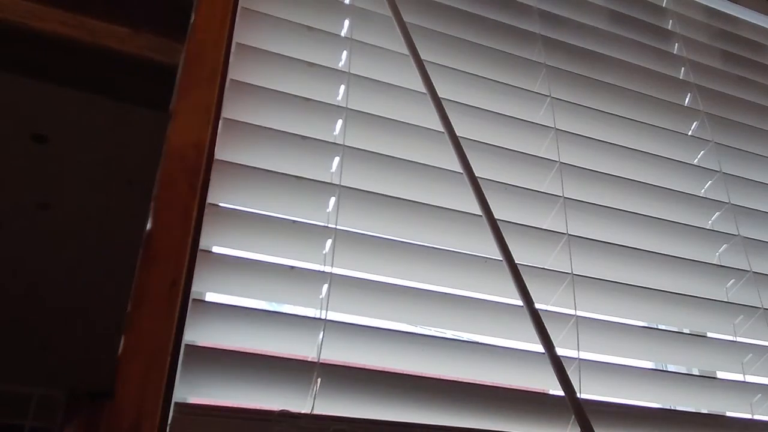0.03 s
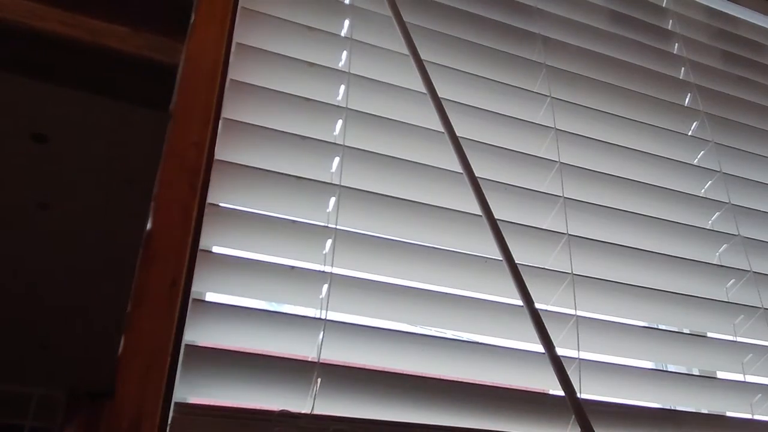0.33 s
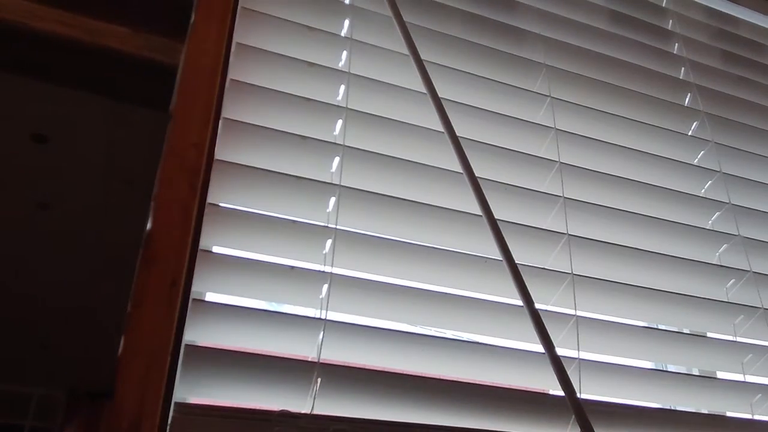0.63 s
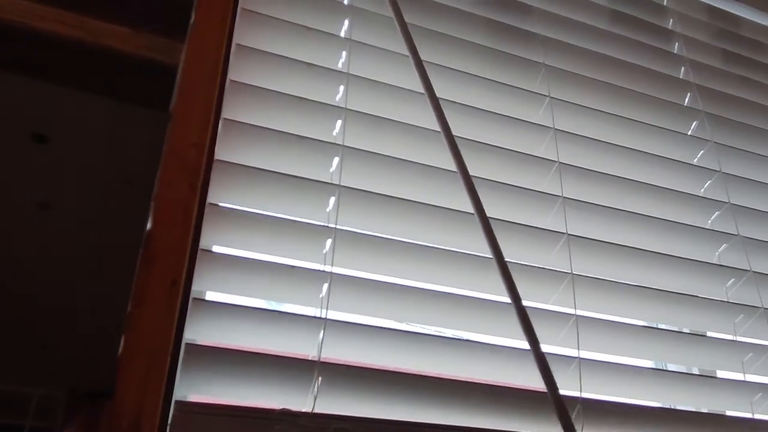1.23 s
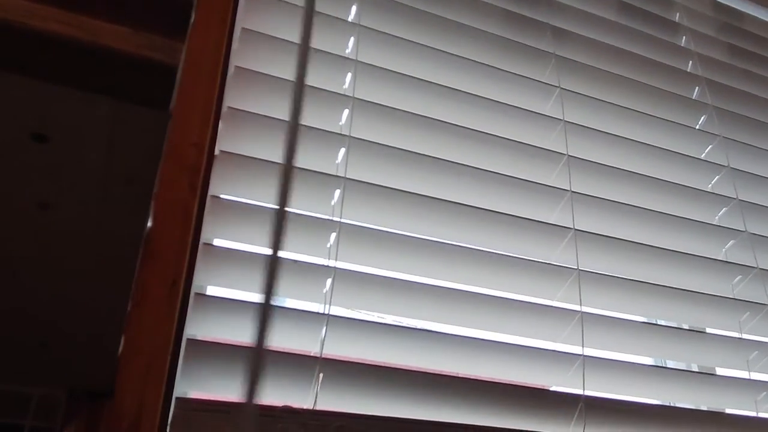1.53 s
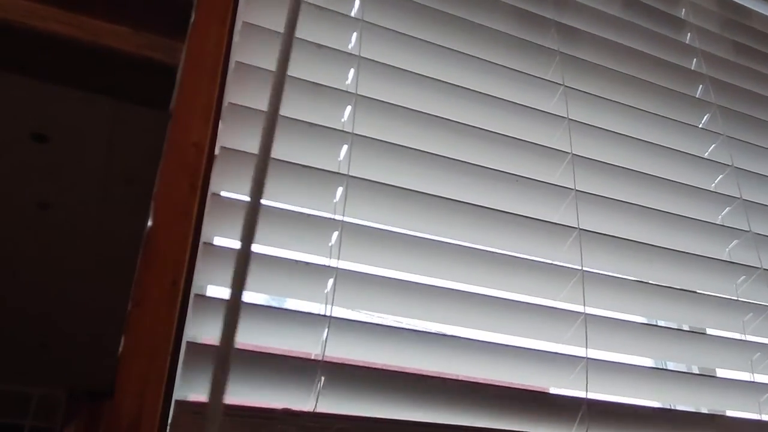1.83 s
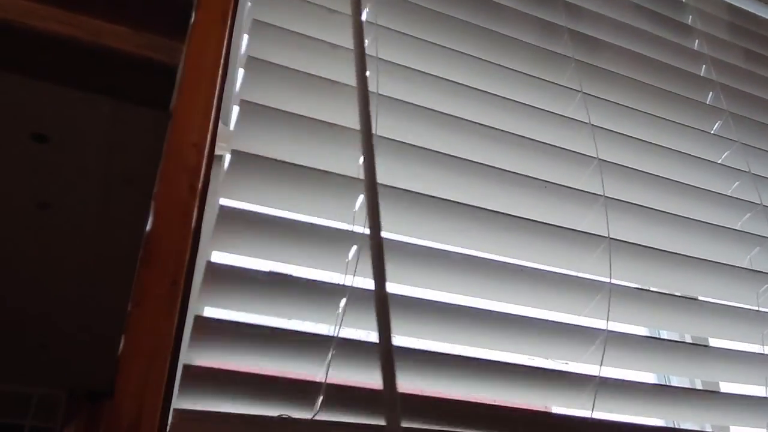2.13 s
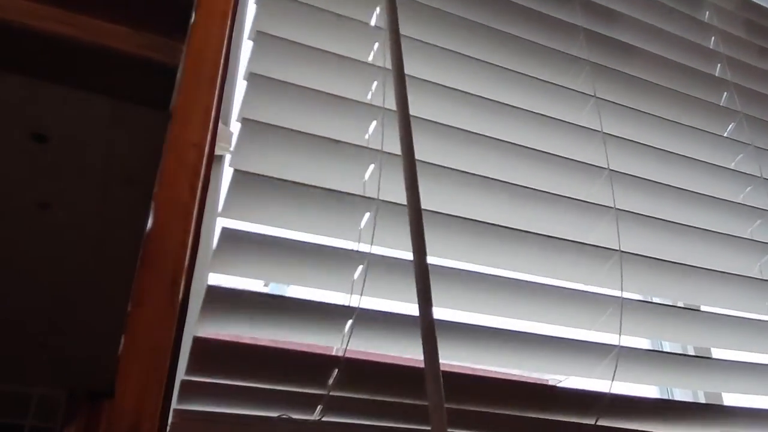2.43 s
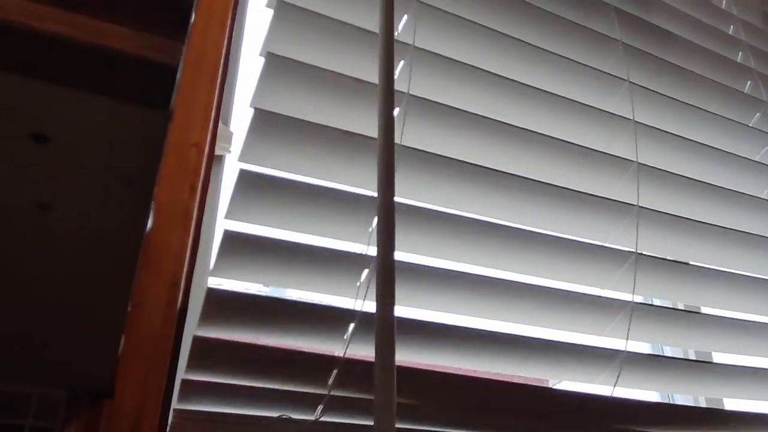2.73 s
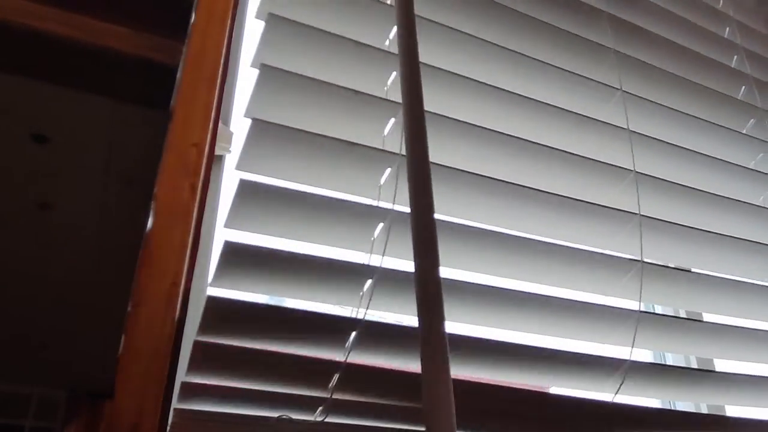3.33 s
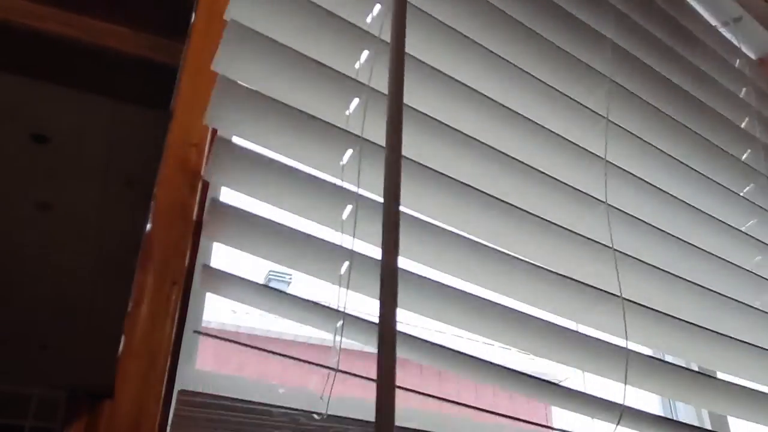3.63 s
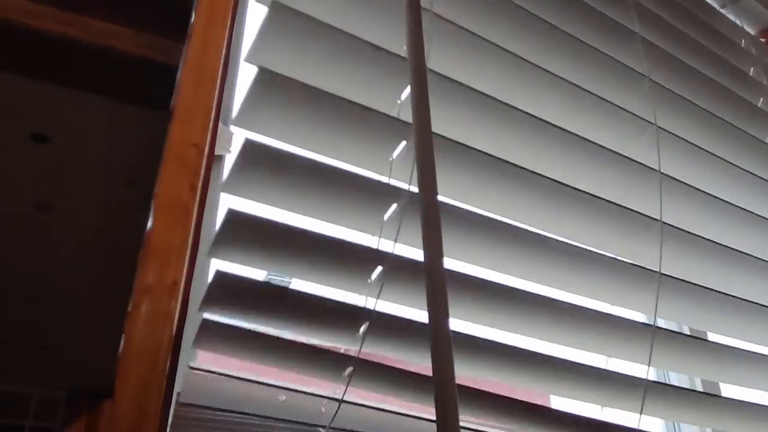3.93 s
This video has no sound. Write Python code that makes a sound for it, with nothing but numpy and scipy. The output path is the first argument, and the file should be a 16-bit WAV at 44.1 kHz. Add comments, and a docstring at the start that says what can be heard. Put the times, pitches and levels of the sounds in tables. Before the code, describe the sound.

Window blind slats rustle faintly, then tap, clack and scrape as they are handled. They rattle louder and slam shut, the bottom rail bumping the frame, heard up close in a small, quiet room.

```python
"""Window blinds tilted shut

Close up in a small quiet room, the tilt gear knocks and the wand taps lightly against the slats.
Pushed about, the slats rub, scrape with a brief pitch and clack together, which sets the hanging blind
ringing. They slam shut with a hard plastic snap, and the bottom rail shudders on the frame."""
import sys
import numpy as np
from scipy import signal
from scipy.fft import rfft, irfft
from scipy.io import wavfile
from scipy.ndimage import uniform_filter1d

SR = 44100
rng = np.random.default_rng(int(sys.argv[2]) if len(sys.argv) > 2 else 0)


def digitize_waveform(pressure):
    """Quantize a signal to 16-bit integers and store it at the path in sys.argv[1].

    Rows of a 2-D input are taken as channels; values are limited to [-1, 1].
    """
    field = np.atleast_2d(pressure).T
    bounded = np.clip(field, -1, 1)
    quanta = np.round(bounded * 32767).astype(np.int16)
    wavfile.write(sys.argv[1], SR, quanta)


N = 176400
HZ = np.fft.rfftfreq(N, 1 / SR)


def amp(db):
    """Decibels to gain."""
    return 10 ** (np.asarray(db) / 20)


def unit_rms(x):
    """Scales to rms 1."""
    return x / np.sqrt(np.mean(x ** 2) + 1e-20)


def curve(points, hz):
    """Reads breakpoints on a log-frequency axis."""
    f, value = np.transpose(points)
    return np.interp(np.log(hz + 1), np.log(f + 1), value)


def add(mix, s, sound):
    """Mixes a stereo sound in at s seconds."""
    part = mix[:, max(round(s * SR), 0):][:, :sound.shape[1]]
    part += sound[:, :part.shape[1]]


def panned(pan_db):
    """Stereo gains, with left pan_db above right."""
    return amp(np.array([[pan_db], [-pan_db]]) / 2)


def room_tone():
    """A faint, steady bed of low noise."""
    # room tone spectrum: (frequency [Hz], level [dB])
    spectrum = [(25, -11.5), (100, -4), (140, -12.5), (240, -2.5), (450, -14), (1200, -19), (4000, -28.5),
                (12000, -32), (13200, -52.5)]
    noise = rfft(rng.standard_normal((2, N)))
    return amp(-69.5) * unit_rms(irfft(noise * amp(curve(spectrum, HZ)), N))


def room_reverb(send):
    """The small room's tail: each band dies at its own speed."""
    # room decay: (frequency [Hz], t60 [s])
    decay = [(100, 0.18), (400, 0.34), (1000, 0.52), (2800, 0.39), (7000, 0.3), (14000, 0.28)]
    hz, t, noise = signal.stft(rng.standard_normal((2, SR)), SR, nperseg=256)
    tail = signal.istft(noise * amp(-60 * t / curve(decay, hz)[:, None]), SR, nperseg=256)[1]
    tail *= np.minimum(np.arange(tail.shape[1]) / SR / .0041, 1)  # fade-in
    return signal.fftconvolve(send, tail / np.linalg.norm(tail[0]), axes=1)[:, :N]


def ringing(modes):
    """Dying modes, slightly out of phase across the stereo pair; low ones lead on the right."""
    t = np.arange(SR * 3 // 4) / SR
    lead_turns, out = np.array([[0], [.25]]), np.zeros((2, len(t)))
    for hz, db, t60 in modes:
        turns = hz * t + lead_turns * (hz < 450) + .2 * rng.random((2, 1))
        out += amp(db - 60 * t / t60) * np.sin(2 * np.pi * turns)
    return out


def blind_resonance(slats):
    """The whole hanging blind rings on, driven by its slats."""
    # modes of the blind: (frequency [Hz], level [dB], t60 [s])
    modes = [(182, -13, 0.44), (275, -16, 0.6), (307.2, -9.5, 1), (566, -14.5, 0.34), (688, -11, 0.4),
             (825.4, -6, 0.47), (966.6, -5, 0.44), (1088, -8, 0.39), (1370, -20.5, .35)]
    ring = ringing(modes)
    return amp(-18.5) * signal.fftconvolve(slats[:1], ring / np.linalg.norm(ring[0]), axes=1)[:, :N]


def knocks(hits, modes, attack_s):
    """Blows on one part of the blind, smeared by the room's first quick echoes."""
    out, t = np.zeros((2, N)), np.arange(SR // 10) / SR
    for s, db in hits:
        ring = ringing(modes)
        ring *= np.sin(np.pi / 2 * np.minimum(np.arange(ring.shape[1]) / SR / attack_s, 1)) ** 2
        echoes = rng.standard_normal((2, len(t))) * np.exp(-t / .019)
        paths = (t == 0) + amp(-1) * echoes / np.linalg.norm(echoes[0])
        add(out, s, signal.fftconvolve(ring, paths, axes=1) * amp(db))
    return out


def gear_knocks():
    """The tilt gear knocks softly as it turns."""
    # knocks: (time [s], level [dB])
    hits = [(.088, -58), (.263, -49), (.507, -52), (.627, -60), (1.27, -36)]
    # gear modes: (frequency [Hz], level [dB], t60 [s])
    modes = [(495, -2, .08), (570, 0, .06), (720, -10, .04)]
    return knocks(hits, modes, attack_s=.007)


def wand_taps():
    """The wand swings into the slats with light, short taps."""
    # taps: (time [s], level [dB])
    hits = [(1.377, -20), (1.448, -47.5), (1.556, -26.5)]
    # wand modes: (frequency [Hz], level [dB], t60 [s])
    modes = [(970, -6, .04), (1012, -25, .4), (1080, 0, .04), (1389, -12, .035), (1600, -14, .02),
             (2100, -15, .025)]
    return knocks(hits, modes, attack_s=.004)


def rail_bumps():
    """The bottom rail bumps the frame with low thuds, ending in a shudder."""
    # bumps: (time [s], level [dB])
    hits = [(1.208, -36), (3.675, -28), (3.9, -17), (3.926, -18), (3.95, -20), (3.974, -23)]
    # rail modes: (frequency [Hz], level [dB], t60 [s])
    modes = [(205, 0, .2), (255, -6, .16), (310, -5, .16)]
    return knocks(hits, modes, attack_s=.009)


def shut_snap():
    """A hard, bright snap as the slats slam shut."""
    # impacts: (time [s], level [dB])
    hits = [(3.6745, -13), (3.679, -11.5)]
    # plastic modes: (frequency [Hz], level [dB], t60 [s])
    modes = [(4140, 2, 0.016), (4505, 3.5, 0.012), (5120, 1.5, 0.011)]
    return knocks(hits, modes, attack_s=.001)


def contacts(grain_db):
    """Dense tiny contacts of uneven size, in four stereo bands of rms 1: bass, body, ring and tick."""
    # the slats' tone as heard through the microphone, whose notch, peaks and roll-off shape
    # the top treble: (frequency [Hz], level [dB])
    miked_tone = [(30, -48), (100, -24.5), (135, -25), (185, -0.5), (260, -9.5), (410, -9), (560, 0),
                  (690, -3), (800, 3.5), (1100, 6.5), (1400, 5.5), (1950, 1), (2500, -3.5), (3150, -7.5),
                  (3900, -5.5), (4900, -11), (5800, -12.5), (7000, -9.5), (8200, -8), (8900, -18),
                  (9500, -28), (10500, -19), (11800, -11), (12400, -20.5), (13200, -30), (15500, -35)]
    shared_power, crossovers_hz = .032, (600, 2500, 6500)
    grit = rng.standard_normal((3, N))  # left, right, shared
    grit *= amp(grain_db * np.repeat(rng.standard_normal(N // 16 + 1), 16)[:N])
    stereo = np.sqrt(1 - shared_power) * grit[:2] + np.sqrt(shared_power) * grit[2]
    spectrum = rfft(stereo) * amp(curve(miked_tone, HZ))
    lowpasses = [0 * HZ] + [1 / (1 + (HZ / f) ** 8) for f in crossovers_hz] + [1 + 0 * HZ]
    return np.array([unit_rms(irfft(spectrum * band, N)) for band in np.diff(lowpasses, axis=0)])


def one_slat(bands, s, size):
    """The contacts from time s on, through one slat's own irregular comb of modes."""
    depth_db, spacing_hz = 3.3, 130
    part = bands[:, :, round(s * SR):][:, :, :size]
    hz = np.fft.rfftfreq(part.shape[2], 1 / SR)
    grid = np.arange(0, SR / 2, spacing_hz)
    comb = unit_rms(amp(depth_db * np.interp(hz, grid, rng.standard_normal(len(grid)))))
    return irfft(rfft(part) * comb, part.shape[2])


def slat_rubs():
    """Slats slide on each other and on their cords, catching unevenly."""
    # strokes: (start [s], length [s], bass [dB], body [dB], ring [dB], tick [dB], swell [dB])
    strokes = [(0.024, 0.29, -72.5, -76.5, -77.5, -74.5, -5), (0.433, 0.12, -92, -83, -78.5, -77, -15),
               (0.495, 0.082, -76, -82, -72, -65.5, -9.5), (0.571, 0.12, -81, -102, -79, -80.5, 11),
               (0.708, 0.061, -72, -66.5, -72, -73, 2.5), (0.769, 0.12, -82, -70.5, -78, -82, 5),
               (0.846, 0.025, -90, -71, -99, -66.5, -2), (1.199, 0.016, -58.5, -51.5, -77, -80, 7),
               (1.304, 0.087, -54, -50.5, -62, -69, 7.5), (1.527, 0.044, -70.5, -60, -68.5, -74.5, 13),
               (1.748, 0.022, -64, -47, -60, -63, 31), (2.02, 0.19, -72, -65, -76, -64, -7),
               (2.396, 0.11, -66.5, -58, -67, -76, 16), (2.743, 0.031, -67, -56, -65.5, -73, 5.5),
               (3.285, 0.13, -64, -53.5, -70, -69.5, 11.5), (3.381, 0.12, -58, -43, -55.5, -67, 22),
               (3.483, 0.16, -46, -43, -45.5, -42, 10), (3.64, 0.1055, -26, -35.5, -42, -47.5, 7.5),
               (3.75, 0.12, -33, -34, -39, -49, -8.5), (3.869, 0.14, -49.5, -38.5, -52.5, -54.5, -6.5)]
    flutter_db, flutter_s, fade_s = 1.5, .01, .012
    bands, out = contacts(grain_db=3.5), np.zeros((2, N))
    bands *= amp(flutter_db * unit_rms(uniform_filter1d(rng.standard_normal(N), int(flutter_s * SR))))
    for s, length, *levels, swell_db in strokes:
        rub = np.tensordot(amp(levels), one_slat(bands, s, round((length + fade_s) * SR)), 1)
        t = np.arange(rub.shape[1]) / SR
        fades = np.clip(np.minimum(t, length + fade_s - t) / fade_s, 0, 1)
        swell = amp(swell_db * (np.minimum(t / length, 1) - .5))
        add(out, s, rub * fades * swell)
    return out * panned(-2)


def slat_scrapes():
    """A slat's edge drags over the next: friction feeds resonances that sag as the contact slides."""
    # drags: (start [s], length [s], level [dB], pitch [Hz])
    drags = [(2.423, 0.056, -51.5, 1390), (2.476, 0.029, -40, 1370), (2.925, 0.033, -55, 1150),
             (2.988, 0.081, -56, 1407), (3.463, .035, -34, 1399)]
    # edge resonances: (ratio to the pitch, width [Hz], level [dB])
    resonances = [(.83, 69, -7.5), (1, 80, -1.5), (1.252, 500, -3), (1.52, 120, -14.5), (1.692, 89, -3.5)]
    sag, out = .036, np.zeros((2, N))
    for s, length, db, hz in drags:
        progress = np.linspace(0, 1, round(length * SR))
        turns = np.cumsum(hz * (1 - sag * (progress - .5))) / SR
        scrape = np.zeros((2, len(turns)))
        for ratio, width, mode_db in resonances:
            friction = rng.standard_normal((2, N // 10)) + 1j * rng.standard_normal((2, N // 10))
            lowpass = signal.butter(2, width / 2, fs=SR, output="sos")
            wobble = signal.sosfilt(lowpass, friction)[:, -len(turns):]
            scrape += amp(mode_db) * unit_rms((wobble * np.exp(2j * np.pi * ratio * turns)).real)
        pressure = np.interp(progress, [0, .6, 1], [0, 1, 0]) ** .5
        add(out, s, amp(db) * unit_rms(scrape) * pressure)
    return out


def slat_clacks():
    """One slat strikes the next: a flurry of contacts lasting milliseconds, and the slat's short note."""
    # clacks, with the four bands relative to the level: (time [s], level [dB], bass [dB], body [dB],
    # ring [dB], tick [dB], left over right [dB], slat pitch [Hz], decay [s])
    hits = [(1.769, 0.5, -38.5, -23, -24.5, -20.5, 0.5, 940, 0.0058),
            (1.792, 0.5, -37, -18, -21, -17.5, -0.5, 717, 0.01),
            (1.959, -38.5, -6.5, 5.5, -3.5, -11, -4.5, 850, 0.0089),
            (1.992, -30.5, -25.5, -2, -12.5, -15, 1.5, 1116, 0.0054),
            (2.036, -24.5, -5, -4.5, -10.5, -21, -1.5, 940, 0.013),
            (2.06, -32.5, -33, -8, -7, -6.5, -5, 1017, 0.0022),
            (2.092, -33, -47, -10, -28, -17, -6, 698, 0.0028),
            (2.349, -45.5, -23.5, -7.5, -15, -12.5, -4, 1587, 0.017),
            (2.769, -35, -14, -7.5, 2, -2.5, -1.5, 1698, 0.0045),
            (3.083, -46.5, -12, 0.5, -2.5, -3, -3, 1435, 0.0095),
            (3.397, -31, -17.5, -14, -9, -14, -2, 818, 0.0038),
            (3.444, -21.5, -16, -15, -11, -17, -1, 1100, 0.0034),
            (3.495, -15, -10.5, -14, -9.5, -15, -0.5, 1010, 0.0056),
            (3.527, -19, -42, -7, -14, -10, -2.5, 1335, 0.0029),
            (3.585, -13, -38, -9, -10, -6.5, 0, 1566, 0.0024),
            (3.616, -6, -19.5, -13.5, -14.5, -29, 0.5, 858, 0.017),
            (3.637, 0, -40, -8, -18, -17.5, -0.5, 1436, 0.0074),
            (3.677, -4.5, -22, -13, -11.5, -25.5, 1.5, 1085, 0.0098),
            (3.787, -22.5, -3.5, -5, -21, -15, -5, 2760, 0.0037),
            (3.804, -16.5, -11, -10, -17, -28, 4, 1388, 0.0095),
            (3.882, -24, -2, -5, -11, -44, 0.5, 936, 0.01),
            (3.938, -16.5, -7.5, -12.5, -12, -26, -3.5, 1483, 0.0045)]
    attack_s, bass_stretch, note_t60_s = .0038, 2.17, .042
    bands, out, t = contacts(grain_db=2.5), np.zeros((2, N)), np.arange(SR // 6) / SR
    for s, level, bass, body, ring, tick, pan, hz, decay in hits:
        gain = amp(level - 5) * panned(pan)
        flurry = one_slat(bands, s, len(t))
        for band, db, stretch in zip(flurry, (bass, body, ring, tick), (bass_stretch, 1, 1, 1)):
            age = t[:band.shape[1]] / stretch
            rise = np.minimum(age / attack_s, 1) ** .5
            fall = np.exp(-np.maximum(age - 2 * attack_s, 0) / decay)
            add(out, s, gain * band * amp(db) * rise * fall)
        note_db = body + 6.5 - .15 * level  # softer blows sound purer
        note = ringing([(hz, note_db, note_t60_s)])[:, :len(t)]
        add(out, s, gain * note * np.minimum(t / attack_s, 1))
    return out


def scene():
    """Clacks and friction set the blind ringing; they and the knocks feed the reverb, over room tone."""
    clack = slat_clacks()
    friction = slat_rubs() + slat_scrapes()
    knock = wand_taps() + gear_knocks() + rail_bumps() + shut_snap()
    ring = blind_resonance(clack + friction)
    reverb = room_reverb(amp(-4.5) * clack + amp(-9) * friction + amp(-9.5) * knock)
    return clack + friction + knock + ring + reverb + room_tone()


def record(dry):
    """The treble reaches the right microphone more; a steep low-pass trims the very top."""
    # stereo balance: (frequency [Hz], left over right [dB])
    balance = [(250, 0.5), (1200, 2.5), (4000, -2.5), (12000, -4.5)]
    pan_db = curve(balance, np.fft.rfftfreq(2 * N, 1 / SR))
    heard = irfft(rfft(dry, 2 * N) * amp(np.array([[.5], [-.5]]) * pan_db))[:, :N]
    lowpass = signal.firwin(511, 15800, window=("kaiser", 9), fs=SR)
    return signal.oaconvolve(heard, lowpass[None], "same")


dry = scene()
out = record(dry)
digitize_waveform(out)
```